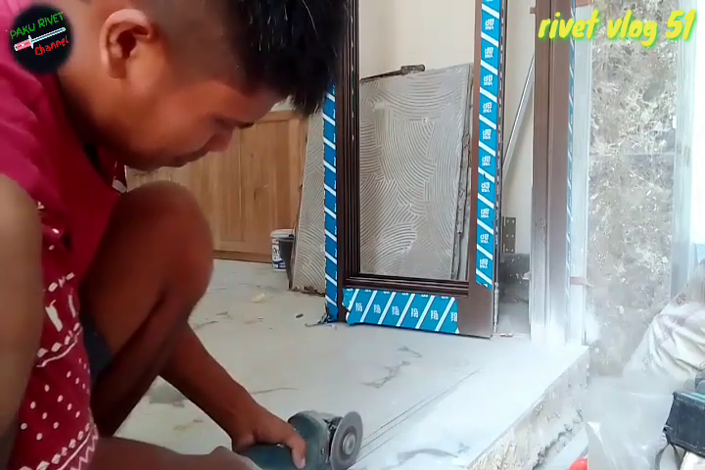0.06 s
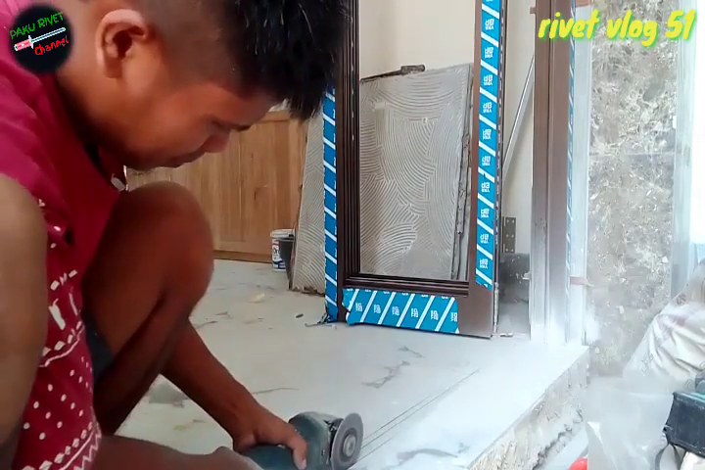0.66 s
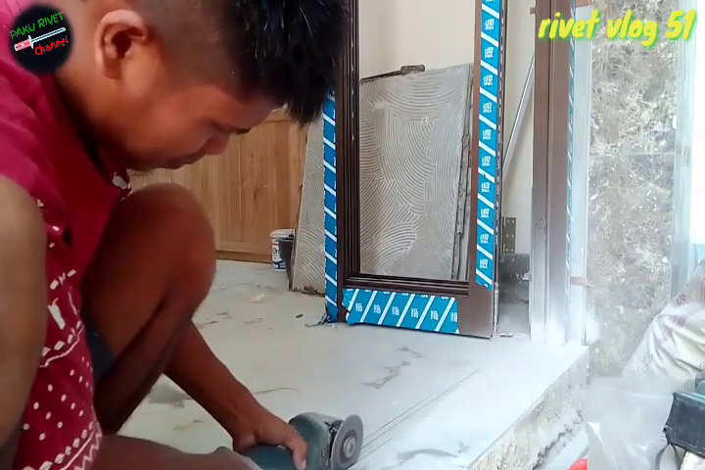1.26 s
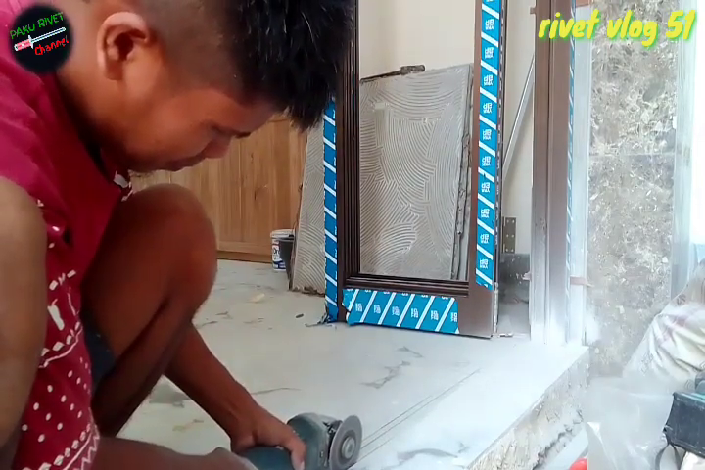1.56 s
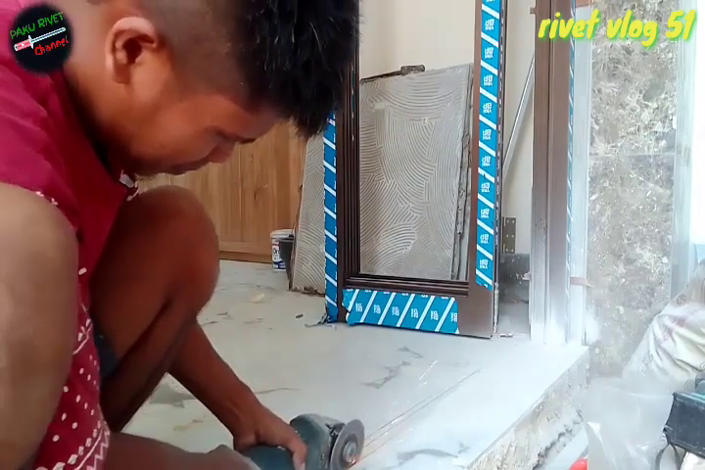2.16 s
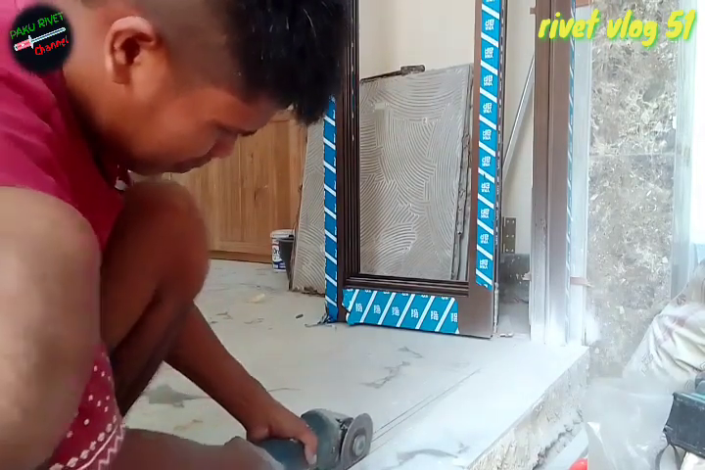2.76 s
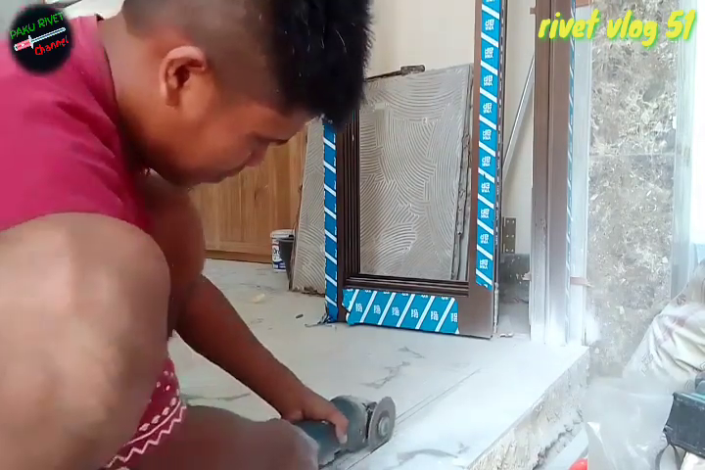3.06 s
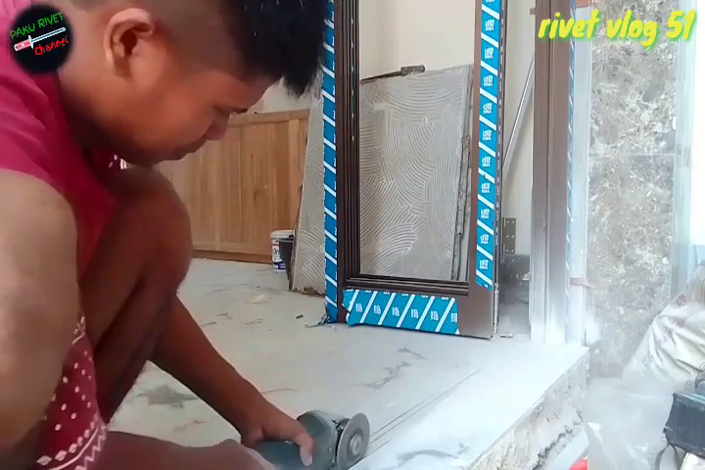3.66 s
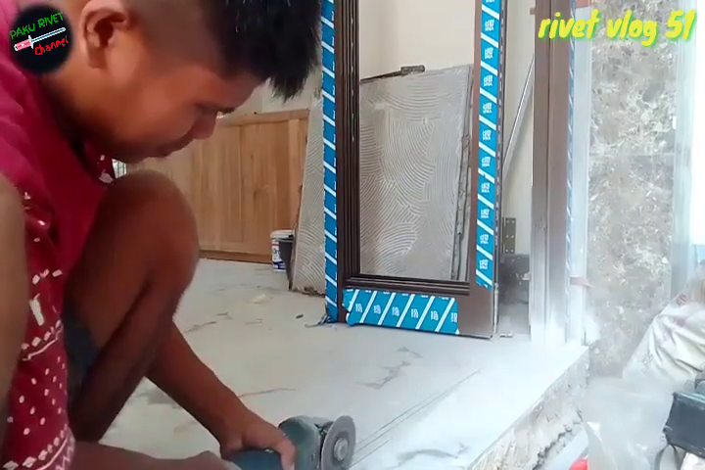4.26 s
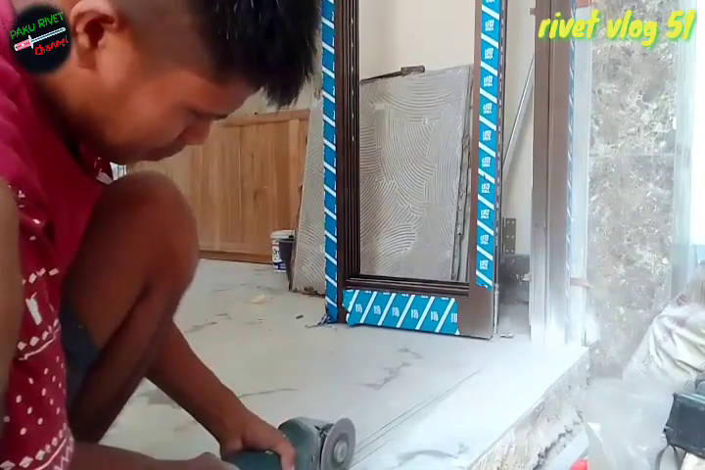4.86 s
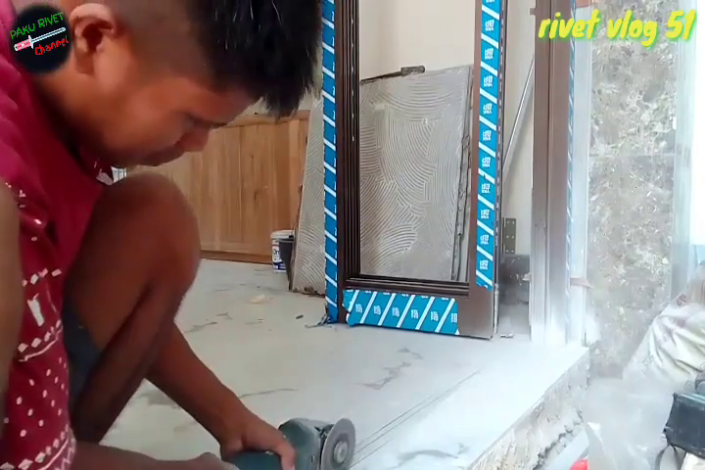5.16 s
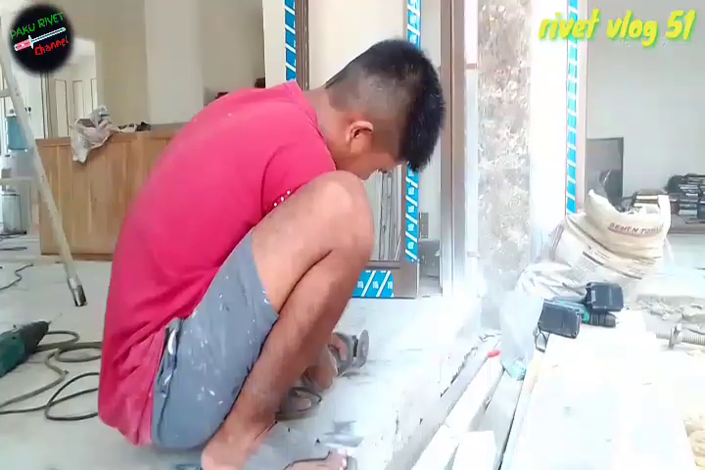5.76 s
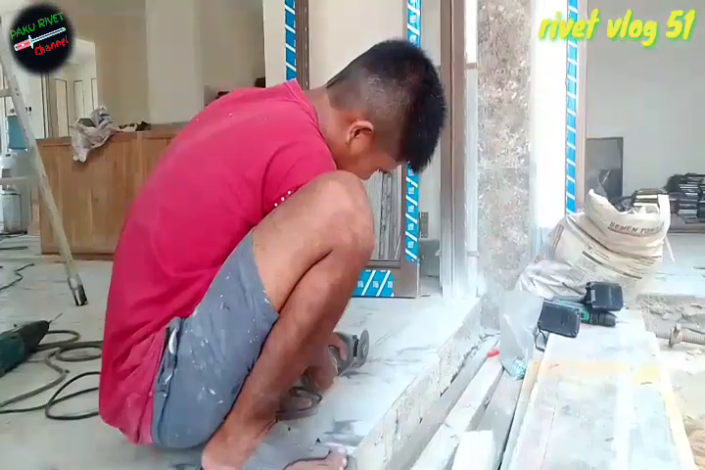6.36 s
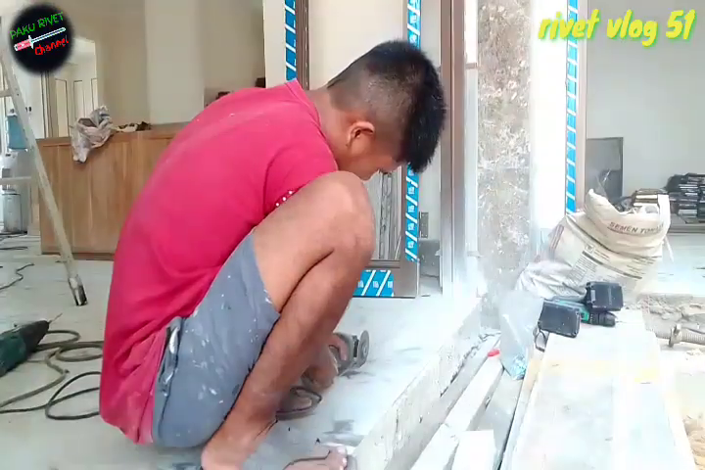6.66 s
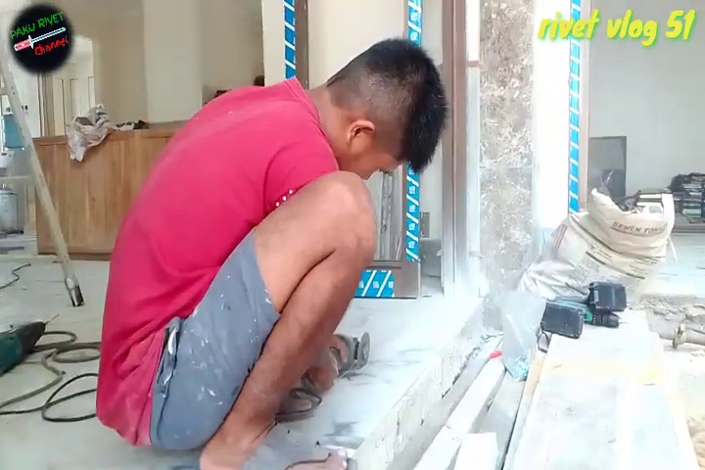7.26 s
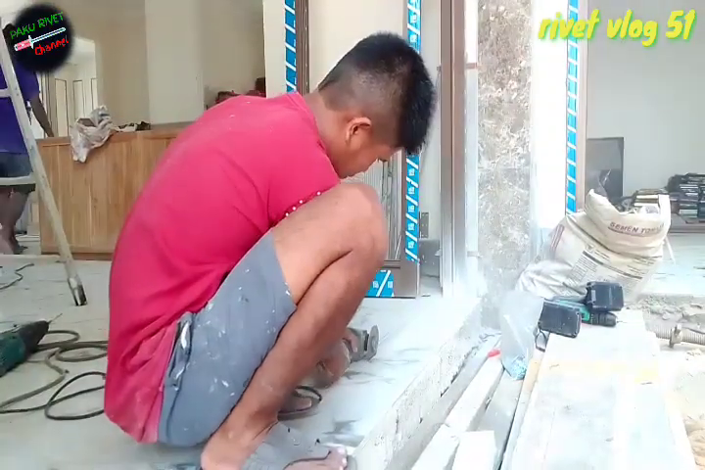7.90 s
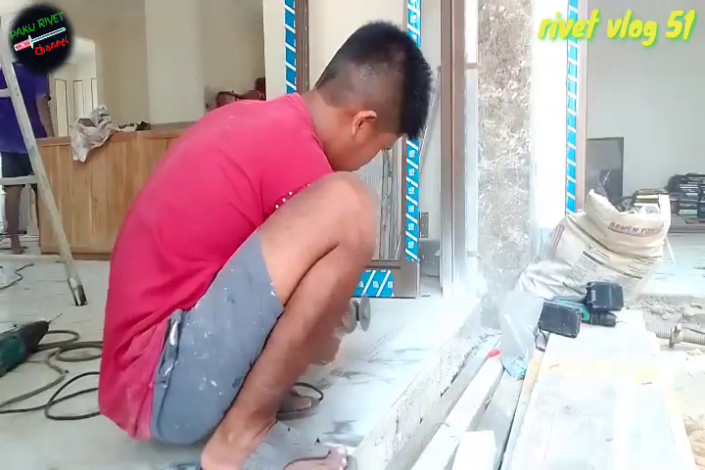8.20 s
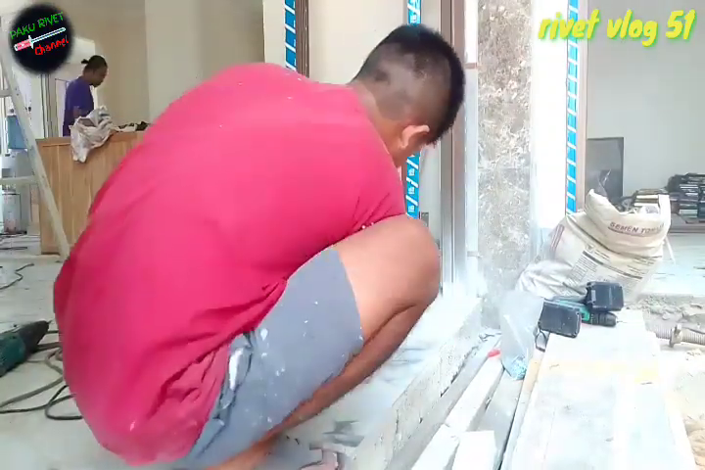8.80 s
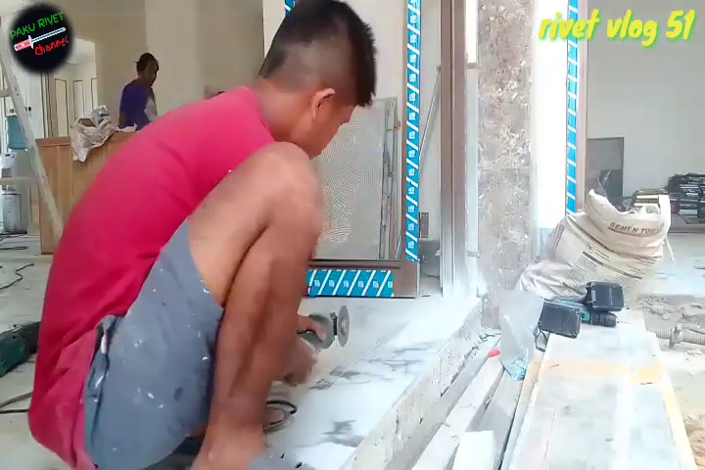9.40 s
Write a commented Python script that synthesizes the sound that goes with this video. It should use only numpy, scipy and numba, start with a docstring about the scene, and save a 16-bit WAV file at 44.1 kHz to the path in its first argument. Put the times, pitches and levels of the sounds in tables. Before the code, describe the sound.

From the start, an angle grinder cuts a ceramic floor tile, heard close up in a bare room with a slight, short echo. The sound is a dense, gritty roar with a low rumble beneath and a bright dusty hiss above. Around 3 seconds the steel disc rings more clearly, high and metallic, then dulls again by about 4 seconds. At about 5.6 seconds everything drops abruptly to silence, and the cutting returns just as suddenly at 6.3 seconds. The ringing sharpens again near 7.6 seconds. At about 8.1 seconds the disc lifts clear and the roar quickly falls away. The motor runs on more quietly, a high wavering whine over rushing air, with brief sizzling flares from its brushes. A few light, dull knocks come around 8.3 seconds as the tool is moved, and a fainter one near 9.5 seconds.

```python
"""A dense, gritty roar fills a bare room: an angle grinder is cutting a ceramic floor tile.
Grit on the disc chips the tile, shaking the floor and throwing off hissing dust,
and the steel disc rings whenever the slot loosens its grip. The sound drops out once.
Near the end the disc lifts clear and the motor whines on in its own cooling air,
with sparking brushes and a few light knocks as the tool is moved."""
import sys
import numpy as np
from scipy import signal
from scipy.fft import rfft, irfft, next_fast_len
from scipy.io import wavfile
from numba import njit

SR = 44100
rng = np.random.default_rng(int(sys.argv[2]) if len(sys.argv) > 2 else 0)


def store_pcm(level_fs):
    """Save levels as 16-bit WAV."""
    pcm = np.round(np.clip(level_fs, -1, 1) * 32767).astype(np.int16)
    wavfile.write(sys.argv[1], SR, np.atleast_2d(pcm).T)


N = 420713
TIME = np.arange(N) / SR
DROPOUT_S, SECOND_CUT_S, LIFT_S = 5.650, 6.322, 8.124
ROTOR_HZ, SPINDLE_HZ = 513.5, 147   # nominal turning rates

# play of the disc in the slot: (time [s], play [0 pinched - 1 free])
SLOT_PLAY = [(0, 0.16), (2.35, 0.33), (2.75, 0.64), (3.05, 0.96), (3.35, 0.94), (3.85, 0.68), (4.15, 0.35),
             (4.45, 0.27), (5.3, 0.25), (5.6, .3), (6.35, 0.21), (7.3, .15), (7.6, 0.89), (7.85, 0.81),
             (8.12, 0.62)]
# accents where the disc bites harder: (time [s], boost [dB])
BITE_ACCENTS = [(2.27, 4), (5.03, 3), (7.08, 2), (8.05, 0.5), (8.105, 2.5)]
def cut():
    """Grit chips the tile under a wavering hand; the flanks of a pinched disc rub in the slot."""
    play, = in_time(SLOT_PLAY)
    feed_db = -.5 * (TIME > SECOND_CUT_S) + .35 * drift(6.4)   # the second cut is pressed more lightly
    feed_db += sum(swell(s, half_s=.016, db=db) for s, db in BITE_ACCENTS)
    chipping = roar(play, feed_db) + floor_rumble() + dust_hiss(play, feed_db)
    rub = from_db(-56.5) * (1 - play) * resonance(grit(per_s=6000, spread_db=4), hz=8480, width_hz=1800)
    uneven_db = .44 * drift(35)
    return from_db(contact_db() + uneven_db) * (chipping + rub)


def contact_db():
    """The disc presses on the tile until the lift: a quick drop, then a fading graze."""
    since_lift = np.maximum(TIME - LIFT_S, 0)
    drop_db, drop_s, graze_db_per_s = 12.5, .026, 115
    return -drop_db * np.minimum(since_lift / drop_s, 1) - graze_db_per_s * since_lift


# midrange body of the cut, as an EQ curve: (frequency [Hz], gain [dB])
ROAR_EQ = [(180, -24), (330, -5.5), (550, -1), (800, -0.5), (1500, -2), (2000, -2.5), (2600, -8.5),
           (4000, -20.5), (8000, -44)]
def roar(play, feed_db):
    """Dense chips boom in the guard's cavity, which shifts as the tool rocks; a loose disc rattles the tile."""
    guard_hz = 1294 * (1 + .018 * play + .0161 * drift(5))
    guard = from_db(.64 * play) * resonance(grit(per_s=5000, spread_db=1.5), guard_hz, width_hz=455)
    tile = from_db(-10.5) * play * resonance(grit(per_s=2500, spread_db=1.5), hz=580, width_hz=300)
    chips = coloured(grit(per_s=7000, spread_db=2.5), ROAR_EQ)
    return from_db(-30 + play + feed_db) * unit_rms(chips + guard + tile)


# low end of the cut: (frequency [Hz], gain [dB])
RUMBLE_EQ = [(10, -17), (25, -0.5), (45, 0.5), (120, -2), (205, -2), (300, -4), (500, -6.5), (750, -10.5),
             (1100, -16.5), (2500, -44)]
# how hard the floor shakes: (time [s], level [dB])
RUMBLE_ENVELOPE = [(0, -34), (1.8, -33), (3.05, -33), (3.4, -35), (4.05, -33.5), (4.6, -34.5), (5.6, -32),
                   (6.35, -36), (6.95, -35), (7.55, -37), (8.1, -38)]
def floor_rumble():
    """The chipping shakes the floor under the tile."""
    level_db = in_time(RUMBLE_ENVELOPE)[0] + .8 * drift(6)
    return from_db(level_db) * coloured(grit(per_s=3000, spread_db=2.5), RUMBLE_EQ)


# bright top of the cut: (frequency [Hz], gain [dB])
DUST_EQ = [(1200, -20), (2200, -1), (3000, 2), (4400, -1), (5500, -4.5), (6700, -8), (7600, -16),
           (8700, -21), (9600, -25), (11900, -20), (13000, -13), (15400, -16.5)]
def dust_hiss(play, feed_db):
    """Fine dust hisses, following the hand's pressure less than the roar does."""
    return from_db(-37.9 + .8 * play + .4 * feed_db) * coloured(grit(per_s=12000, spread_db=3.5), DUST_EQ)


# steely partials: (pinched frequency [Hz], shift when free [Hz], pinched level [dB],
# free level in the first cut [dB], free level in the second cut [dB])
DISC_MODES = [(5190, -20.5, -61, -52, -53), (5740, 32, -59.5, -58, -52), (6420, -68, -59.5, -56, -52),
              (7080, 67, -53, -47, -52), (8120, -100, -54, -54.5, -50), (8990, 115, -58, -49.5, -53.5),
              (10330, -135, -61, -56.5, -54), (11390, 150, -57.5, -64.5, -51.5),
              (12900, -190, -60.5, -61, -54), (13850, -100, -60.5, -65, -68), (14250, 159, -57, -54.5, -58)]
def disc_ring():
    """Grit rings the steel disc; a loose slot damps it less, so its modes sharpen and shift."""
    play, = in_time(SLOT_PLAY)
    pinched_width_hz, free_width_hz = 460, 100
    width_hz = pinched_width_hz + play * (free_width_hz - pinched_width_hz)
    hold_s, fade_db_per_s = .047, 93   # ring-out after the lift, for a mode at 8 kHz
    fade_db = -fade_db_per_s * np.maximum(TIME - LIFT_S - hold_s, 0)
    chips = grit(per_s=6000, spread_db=5)
    ring = 0
    for hz, shift_hz, pinched_db, first_db, second_db in DISC_MODES:
        free_db = np.where(TIME < SECOND_CUT_S, first_db, second_db)
        level_db = pinched_db + play * (free_db - pinched_db)
        level_db += 1.4 * drift(6.4)   # the wandering contact favours one mode, then another
        level_db += fade_db * (hz / 8000) ** 2   # high modes die first
        ring += from_db(level_db) * resonance(chips, hz + play * shift_hz, width_hz)
    return ring


# swings of the whine as the tool is turned in the hand: (time [s], level [dB])
WHINE_ENVELOPE = [(8.17, -46.5), (8.25, -42.5), (8.48, -49.5), (8.84, -42), (9.0, -49.5), (9.14, -50),
                  (9.24, -46.5), (9.38, -44.5), (9.46, -49)]
def motor():
    """The motor runs throughout; under load it slows a little and its pitch wavers more."""
    whine_db, = in_time(WHINE_ENVELOPE)
    load = from_db(contact_db())
    speed = 1 - .004 * load + (.0012 + .006 * load) * drift(3)
    return cooling_air(whine_db) + fan_whine(whine_db, load, speed) + brushes(load, speed) + hum(speed)


# breathy rush from the vents: (frequency [Hz], gain [dB])
AIR_EQ = [(25, -27), (110, -40.5), (190, -30.5), (290, -18), (600, -10), (1000, -3), (1300, 1),
          (1580, -1.5), (2500, -4.5), (3400, -8.5), (5200, -10), (7500, -13), (8900, -10.5), (9700, -19.5),
          (12000, -25), (15400, -22.5)]
def cooling_air(whine_db):
    """Air rushes out, loosely following the whine and swelling as the vents swing round."""
    level_db = -43.5 + .14 * (whine_db - whine_db.mean()) + swell(9.33, half_s=.19, db=1.8)
    return from_db(level_db + .5 * drift(20)) * coloured(rng.standard_normal(N), AIR_EQ)


# rough fan and gear partials: (pitch [x rotor rate], width [Hz], gain [dB])
WHINE_PARTIALS = [(8.5, 129, -9), (8.87, 169.7, -6), (9, 55.1, -4), (9.1, 260, -8), (9.49, 75, -9.5)]
def fan_whine(whine_db, load, speed):
    """Fan and gears whine around a clean blade tone, softer under load, over the rotor's faint note."""
    rotor_hz, blade_count = ROTOR_HZ * speed, 9
    dip_db = swell(8.858, half_s=.007, db=-14.5)   # the whine dips briefly
    rough_db = whine_db + dip_db - .5 - 4.6 * load + 1.5 * drift(25)
    rough = from_db(rough_db) * partials(WHINE_PARTIALS, rotor_hz)
    rotor_db = -67 + swell(8.83, half_s=.17, db=9)
    rotor = from_db(rotor_db + 1.5 * drift(12)) * tone(hz=519 * speed, wobble_hz=7)
    blade_db = rotor_db + 7.5 + dip_db - 3 * load + 2.8 * drift(25)
    blades = from_db(blade_db) * tone(blade_count * rotor_hz, wobble_hz=14.1)
    return rough + rotor + blades


# high sizzle: (pitch [x rotor rate], width [Hz], gain [dB])
BRUSH_PARTIALS = [(24.2, 330, -6.5), (25.05, 260, -13), (25.35, 230, -6.5), (26.9, 160, -13),
                  (28.1, 150, -12), (28.65, 130, -16), (29.2, 150, -11.5), (30, 150, -10)]
# flares in the sizzle: (time [s], half length [s], boost [dB])
SPARK_ACCENTS = [(8.25, .04, 11), (8.35, .017, 16), (8.54, .035, 9), (8.88, .015, 6), (9.17, .025, 5),
                 (9.245, .025, 6), (9.36, .05, 10), (9.49, .018, 7)]
def brushes(load, speed):
    """The brushes hiss on the commutator, louder when they spark."""
    spark_db = sum(swell(*spark) for spark in SPARK_ACCENTS)
    level_db = -62.5 + spark_db - 2.5 * load + 1.8 * drift(30)
    return from_db(level_db) * partials(BRUSH_PARTIALS, ROTOR_HZ * speed)


# quiet bed of gear noise: (pitch [x spindle rate], width [Hz], level [dB])
HUM_PARTIALS = [(1.02, 20, -90), (2.04, 30, -76.5), (3, 22, -68.5), (5.7, 25, -67), (7, 25, -63.5),
                (8.1, 26, -62), (9.04, 23, -58), (17, 210, -59)]
def hum(speed):
    """The gears rattle at the spinning disc."""
    return partials(HUM_PARTIALS, SPINDLE_HZ * speed)


# soft handling thuds: (time [s], peak level [dB])
KNOCK_HITS = [(8.206, -44), (8.266, -31.5), (8.349, -40), (9.491, -48)]
def knocks(top_hz):
    """Lifting and moving the tool knocks it lightly, each time with one short dull push."""
    clicks = np.zeros(N)
    for s, db in KNOCK_HITS:
        clicks[round(s * SR)] = from_db(db)
    lowpass = signal.butter(2, top_hz, fs=SR, output="sos")
    push = signal.sosfilt(lowpass, signal.unit_impulse(SR // 50))
    return signal.fftconvolve(clicks, push / push.max())[:N]


def room(x, t60_s):
    """Bare walls return a short diffuse tail, thin in the bass."""
    t = TIME[:SR // 2]
    tail = rng.standard_normal(len(t)) * from_db(-60 * t / t60_s) * (t > .004)
    band = signal.butter(2, [450, 9000], "band", fs=SR, output="sos")
    return signal.fftconvolve(x, signal.sosfilt(band, tail / np.linalg.norm(tail)))[:N]


def grit(per_s, spread_db):
    """Random chips of uneven size."""
    sizes = from_db(spread_db * np.minimum(rng.exponential(1, N), 4)) * rng.choice([-1, 1], N)
    return sizes * (rng.random(N) < per_s / SR)


def partials(table, turn_hz):
    """Rough tones at multiples of a turning rate."""
    shake = rng.standard_normal(N)
    return sum(from_db(db) * resonance(np.roll(shake, k * SR), multiple * turn_hz, width_hz)
               for k, (multiple, width_hz, db) in enumerate(table))


def tone(hz, wobble_hz):
    """A sine whose pitch trembles a little; rms 1."""
    cycles = np.cumsum(hz + wobble_hz * drift(25)) / SR
    return np.sqrt(2) * np.sin(2 * np.pi * cycles)


def resonance(x, hz, width_hz):
    """Ring a resonance whose centre and width may move; rms 1."""
    turn = np.full(N, 2 * np.pi * hz / SR)
    keep = np.full(N, np.exp(-np.pi * width_hz / SR))
    return unit_rms(glide(x, turn, keep))


@njit
def glide(x, turn, keep):
    """Two resonators in a row with moving centre and damping; the power stays even."""
    out, first, second = np.zeros(len(x)), 0j, 0j
    for i in range(len(x)):
        pole = keep[i] * complex(np.cos(turn[i]), np.sin(turn[i]))
        first = pole * first + x[i] * np.sqrt(1 - keep[i])
        second = pole * second + first * (1 - keep[i])
        out[i] = second.real
    return out


def coloured(x, eq):
    """Shape a sound with an EQ curve; rms 1."""
    size = next_fast_len(N)
    hz, db = np.transpose(eq)
    log_hz = np.log(np.arange(size // 2 + 1) * SR / size + 1)
    gain = from_db(np.interp(log_hz, np.log(hz), db))
    return unit_rms(irfft(rfft(x, size) * gain, size)[:N])


def drift(rate_hz):
    """Slow random modulation; rms about 1."""
    hop, settle = 40, 2000
    pole = np.exp(-2 * np.pi * rate_hz * hop / SR)
    noise = rng.standard_normal(N // hop + settle + 2)
    slow = signal.lfilter([1], [1, -2 * pole, pole * pole], noise)[settle:]
    return np.interp(np.arange(N) / hop, np.arange(len(slow)), unit_rms(slow))


def swell(s, half_s, db):
    """A bell-shaped boost or dip around one moment, in dB."""
    return db * np.exp(-np.minimum(((TIME - s) / half_s) ** 2, 50))


def in_time(rows):
    """The columns of an envelope at every sample."""
    s, *columns = np.transpose(rows)
    return [np.interp(TIME, s, c) for c in columns]


def from_db(db):
    """Gain of a level in dB."""
    return 10 ** (np.asarray(db) / 20)


def unit_rms(x):
    """Scale to rms 1."""
    return x / np.sqrt(np.mean(x ** 2) + 1e-20)


def scene():
    """The grinder close up, in mono, with a little room behind it."""
    grinder = cut() + disc_ring() + motor() + knocks(top_hz=900)
    return (grinder + from_db(-15) * room(grinder, t60_s=.35))[None]


def record(dry):
    """The sound drops out abruptly for a moment; a steep low-pass trims the top."""
    fade_s, cutoff_hz = .0027, 15500
    gate = np.clip(np.maximum(DROPOUT_S - TIME, TIME - SECOND_CUT_S) / fade_s, 0, 1)
    lowpass = signal.ellip(12, .1, 90, cutoff_hz, fs=SR, output="sos")
    return signal.sosfilt(lowpass, dry * gate)


dry = scene()
out = record(dry)
store_pcm(out)
```